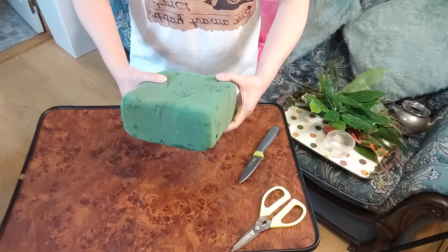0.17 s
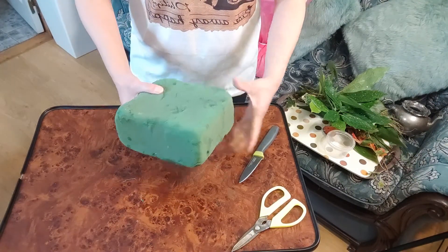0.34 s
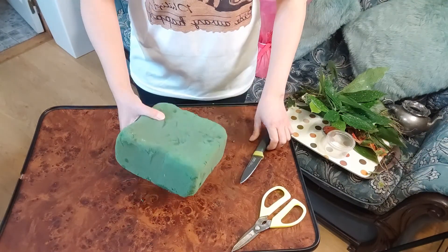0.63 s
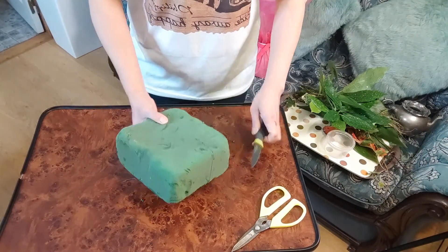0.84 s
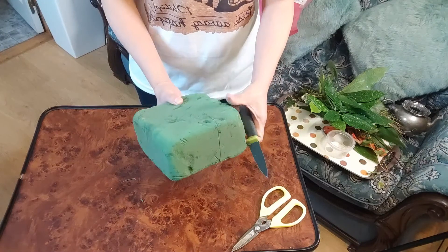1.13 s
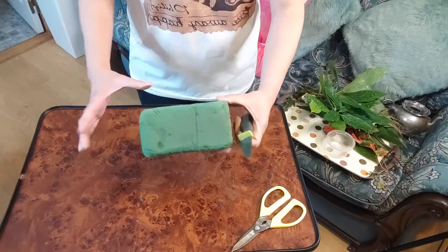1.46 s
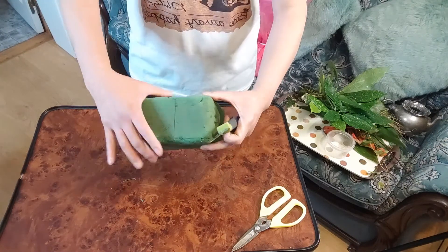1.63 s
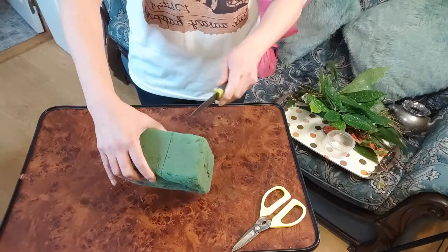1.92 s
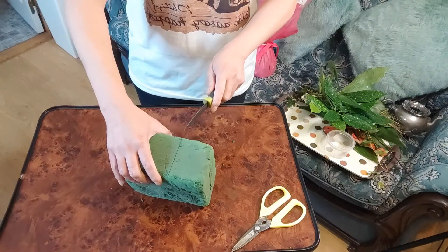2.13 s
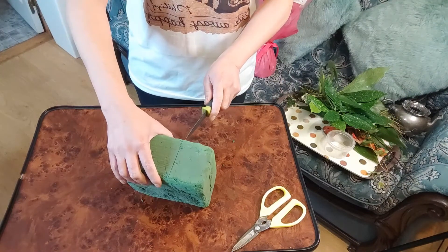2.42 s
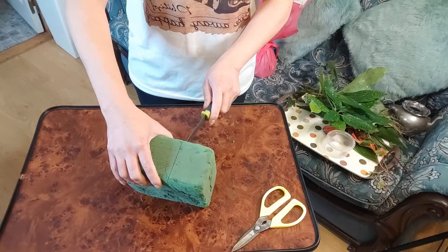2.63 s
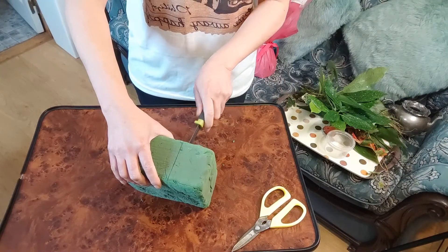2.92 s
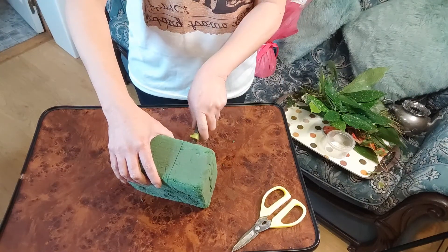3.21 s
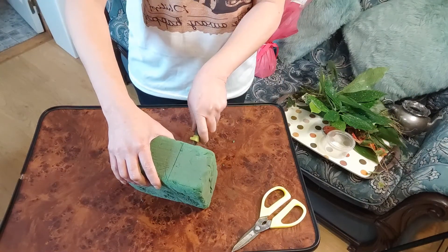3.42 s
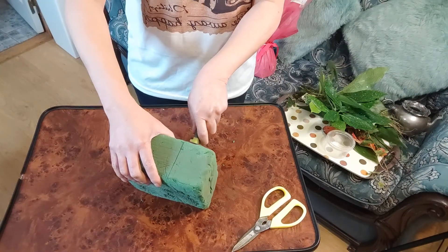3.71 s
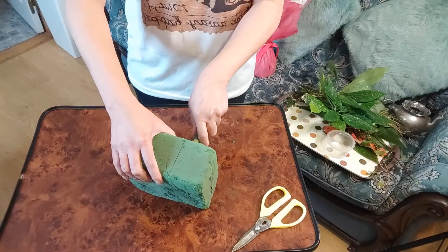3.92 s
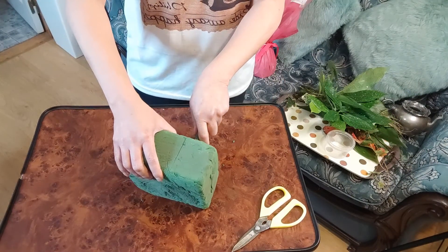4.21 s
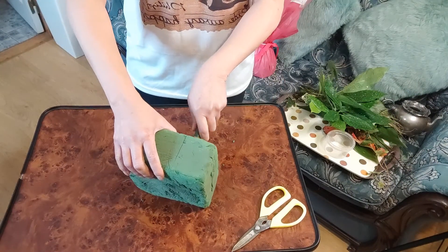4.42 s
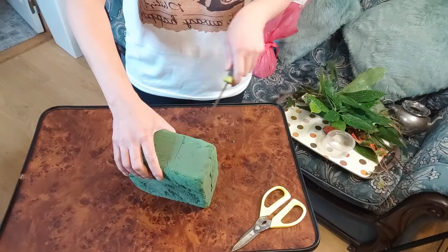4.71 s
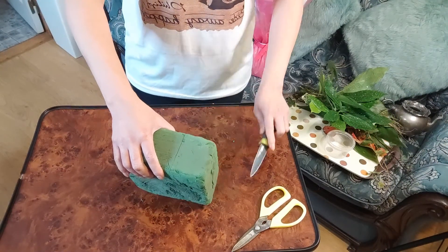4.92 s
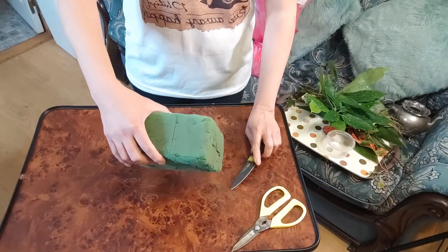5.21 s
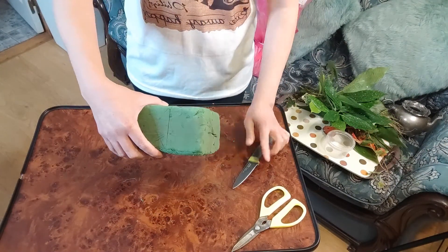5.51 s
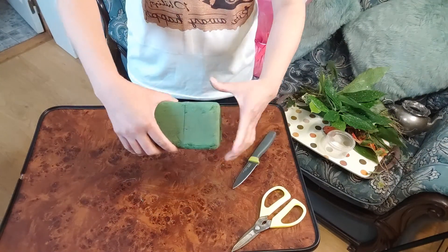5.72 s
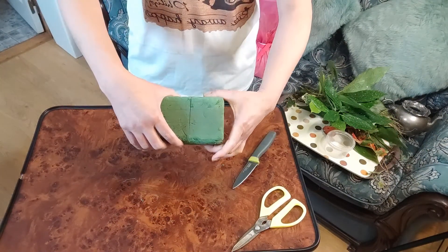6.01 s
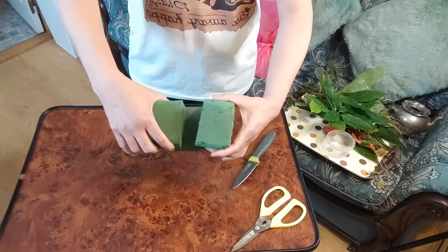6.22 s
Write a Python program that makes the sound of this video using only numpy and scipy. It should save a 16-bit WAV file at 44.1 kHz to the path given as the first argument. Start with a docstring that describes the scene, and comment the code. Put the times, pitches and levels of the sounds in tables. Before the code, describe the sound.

Dry, gritty crunching of a kitchen knife cutting floral foam, heard close up indoors over a faint room hush. Light handling scuffs and dull bumps on a small wooden table come first. The long cut and several shorter strokes end in a loud clack as the blade hits the wood. A lighter clack follows as the knife is put down, then fingers rub the foam and it cracks sharply apart.

```python
"""Soft knocks and dry scuffs, close by: fingers turn a block of floral foam over on a small wooden table.
A kitchen knife rasps in, crushing thousands of brittle cells in one long slice and a few pushes,
then breaks through onto the table with a clack and is laid down. The block snaps in two with a crackle
and a thump. The table top rings under the blows, a small living room answers over its own hush,
and a phone with widened stereo picks it all up."""
import sys
import numpy as np
from scipy import signal
from scipy.fft import rfft, irfft, next_fast_len
from scipy.io import wavfile
from scipy.ndimage import uniform_filter1d, map_coordinates

SR = 44100
rng = np.random.default_rng(int(sys.argv[2]) if len(sys.argv) > 2 else 0)


def transcribe(u):
    """Save the signal u as a 16-bit wav file named by the first command-line argument.

    u: samples, shape (n,) or (channels, n), limited to [-1, 1]; the rate is SR.
    q: integer samples, one column per channel.
    """
    v = np.clip(np.atleast_2d(u).T, -1, 1)
    q = np.round(v * 32767).astype(np.int16)
    wavfile.write(sys.argv[1], SR, q)


N = 280476

# Table levels are relative: each layer sets its own trim in the mix.
# the long first slice into the block: (time [s], rasp [dB], fizz [dB])
LONG_SLICE = [(2.66, -62, -74), (2.77, -52.5, -66.5), (2.874, -46, -50.5), (3.06, -49, -46.5),
              (3.11, -52.5, -49), (3.19, -46.5, -48.5), (3.32, -55, -62), (3.385, -74, -69)]
# short blade strokes, first nick to drawing out: (start [s], rise [s], hold [s], rasp [dB], fizz [dB])
BLADE_PUSHES = [ (2.56, 0.043, 0.005, -53, -65), (3.396, 0.0069, 0.045, -43.5, -50),
                (3.529, 0.0056, 0.26, -43, -49), (3.886, 0.0079, 0.032, -40, -45.5),
                (4.07, 0.076, 0.12, -47, -57), (4.415, 0.044, 0.1, -56, -53.5),
                (4.59, 0.03, 0.0036, -59, -59), ]
# how firmly the blade's force reaches the table: (time [s], drone [dB])
TABLE_COUPLING = [(2.6, -40), (3.24, -4.5), (3.3, 9.5), (3.43, -2.5), (3.92, -3), (4.15, -2), (4.5, 3.5)]
# sharp cracks and ticks, from foam breaking and the knife touching the table:
# (time [s], level [dB], dull jolt against crack [dB], tilt [dB/octave])
SHARP_CLICKS = [ (0.075, -45, -14, 2), (0.595, -50, 5, -9), (1.1674, -26.5, -15.5, 7.5),
                (3.399, -29, -2, 2.5), (3.532, -33, 3.5, -1.5), (3.888, -28.5, -7, 1.5),
                (3.899, -21.5, -6.5, 0), (4.069, -52, -6, -10), (4.098, -38.5, 2, 7), (4.113, -36, -6.5, 4),
                (4.1854, -12, -18, 0), (4.823, -48, -22, 0), (5.4077, -44.5, -17, -1.5),
                (6.061, -27, -17, 4), (6.067, -34.5, -18, 2.5), (6.11, -18.5, -18, 4),
                (6.1278, -25, -17, 3), (6.137, -20, -17, 3), (6.1539, -17.5, -8, -5),
                (6.1546, -8.5, -12.5, 2), ]
# the crack tearing through the block: (start [s], rise [s], hold [s], crackle [dB], thump [dB])
FINAL_TEAR = [(6.112, 0.0036, 0.032, -46.5, -58), (6.155, 0.004, 0.017, -31.5, -35)]
# hands, knife and block meeting the table:
# (time [s], clack [dB], contact low-pass [Hz], ring [dB], centre of the struck modes [Hz])
TABLE_KNOCKS = [ (0.077, -38.5, 192, -82, 300), (0.571, -49, 1050, -33, 690), (0.578, -55, 600, -36, 400),
                (0.598, -41.5, 680, -28.5, 390), (0.659, -51, 650, -30, 620), (0.672, -52, 690, -26, 630),
                (0.685, -36.5, 770, -27, 585), (0.702, -36.5, 730, -27.5, 480), (1.699, -36, 149, -52, 350),
                (3.889, -37, 1110, -27, 380), (4.071, -45, 1220, -71.5, 500), (4.098, -44, 1510, -49, 610),
                (4.113, -37, 1100, -32, 520), (4.123, -36.5, 2020, -47, 900),
                (4.1855, -13, 3420, -23.5, 328), (4.2056, -27.5, 1900, -35, 275),
                (4.451, -42, 1230, -39, 475), (5.25, -68.5, 600, -47, 354), (5.336, -72.5, 600, -46.5, 346),
                (5.389, -54, 600, -41, 353), (5.4077, -28, 3080, -15.5, 690),
                (5.4119, -40.5, 400, -32, 222), (5.415, -47, 2500, -20.5, 1650),
                (5.4225, -33, 2630, -23, 586), (5.482, -70, 600, -34.5, 350), ]
# the knife lifted, then hitting the table: (time [s], ring [dB], centre of the struck modes [Hz])
KNIFE_STRIKES = [(1.164, -38, 10500), (1.169, -47.5, 2594), (4.1859, -16.5, 900), (4.2046, -30.5, 1150)]
# fingers sliding on foam and table: (start [s], rise [s], hold [s], scuff [dB], block's body [dB])
FINGER_RUBS = [ (.069, 0.0018, 0.006, -58.5, -66), (.11, 0.061, 0.066, -68, -80),
               (.25, 0.027, .005, -64.5, -70), (.567, 0.0098, .02, -61, -82),
               (.68, 0.026, 0.0042, -67.5, -93), (.88, 0.005, 0.23, -71.5, -81),
               (1.166, 0.003, .012, -60, -65), (1.235, 0.027, 0.0095, -58.5, -65),
               (1.675, 0.062, 0.023, -56, -60), (2.12, 0.038, .005, -69, -90),
               (5.834, 0.0036, 0.0087, -58.5, -61.5), (5.88, 0.23, 0.18, -64.5, -74), ]
# foam catching on hand, table and blade: (start [s], rise [s], hold [s], level [dB], centre [Hz])
FOAM_SCRAPES = [(0.066, 0.0035, 0.0058, -61, 1340), (0.674, 0.011, .014, -62.5, 2470),
                (1.234, 0.024, .02, -68, 1700), (4.43, 0.0088, 0.068, -57.5, 1420),
                (4.601, 0.016, 0.013, -60, 1950)]
# faint finger squeaks: (start [s], length [s], pitch [Hz], level [dB])
FINGER_SQUEAKS = [(5.07, 0.047, 1390, -70), (5.672, 0.093, 3180, -71)]

# ringing modes: (frequency [Hz], bandwidth [Hz], level [dB])
TABLE_MODES = [(226.4, 11, 6), (360.3, 12.9, 15), (407, 98, 8), (504, 11, -21), (579, 12, 0.5),
               (596, 26, 6), (654.6, 29, 6.5), (747, 39, -4), (1050, 39, -22), (1245, 44, -2),
               (1450, 110, -26), (1610, 17, -11.5), (1840, 100, -1.5)]  # the wooden top
KNIFE_MODES = [(773, 17, -4.5), (890, 13, -3), (1040, 60, -3), (1063, 36, -3), (1232, 8, -10),
               (1266, 5, -5.5), (2570, 41, -10), (7300, 50, -2.5), (10100, 52, -5), (12450, 50, -9),
               (15200, 50, -4)]  # blade and handle together

# tone colours: (frequency [Hz], level [dB])
CRUSH_EQ = [(150, -20.5), (300, -7.5), (600, 0.5), (950, 2), (1350, 4.5), (2700, 0.5), (4100, -5.5),
            (6000, -8), (7800, -10), (9500, -16), (12000, -10.5), (15500, -12)]  # cells crushed by the blade
THRUST_EQ = [(120, -39.5), (240, -10.5), (340, -5), (420, -5), (650, -14.5), (1500, -10.5), (4000, -17)]  # the blade's force on the table
CLICK_EQ = [(100, -47), (330, 7.5), (450, -18), (740, 2), (1300, 1.5), (2000, -3), (3100, 0), (4650, -3),
            (7800, -8.5), (10000, -15.5), (15500, -9)]  # a single crack or tick
TEAR_EQ = [(100, -36), (330, 0), (450, -15), (740, 0.5), (1000, -0.5), (1300, 3.5), (2000, -4),
           (3100, -0.5), (4650, -9.5), (7800, -16), (10000, -12), (15500, -10)]  # the block splitting
BODY_EQ = [(70, -9), (160, -7.5), (300, -1.5), (700, 2.5), (1500, 0), (4000, -38)]  # the block's dull body
CLACK_EQ = [(100, -7.5), (200, -21), (360, -9), (550, -6), (800, -5.5), (1080, -4.5), (1650, -6),
            (3300, -11), (4600, -11), (8000, -17), (15500, -55)]  # a hard contact with the table
SKIN_EQ = [(180, -17), (300, -8), (517, -28), (821, -15), (1240, -8.5), (5850, -18), (8010, -22),
           (8840, -23), (15500, -19.5)]  # skin on foam
HUSH_EQ = [(15, -3), (25, -7.5), (38, -21.5), (50, -8.5), (62, -20), (81, -22.5), (230, -36), (460, -41.5),
           (720, -47), (1450, -52), (4000, -56), (8000, -67.5), (9200, -68), (15500, -50)]  # room tone
SIDE_EQ = [(100, 0), (400, 11), (1200, 8.5), (3000, 4), (7000, 2), (15000, 2.5)]  # the phone's boost of the side signal
LEFT_PORT_EQ = [(3000, 0.5), (4200, -0.5), (4950, 1.5), (5900, -1.5), (7000, 3.5), (7950, 7.5), (8400, 6),
                (8750, -5.5), (9800, -5), (11000, 1), (15500, 0)]  # treble of the left microphone port
RIGHT_PORT_EQ = [(3000, 0.5), (4300, -1.5), (4950, 0.5), (5900, -3), (7400, -6), (7950, -1.5), (8550, -17),
                 (9300, 2.5), (11000, -3.5), (13000, -0.5), (15500, -0.5)]  # treble of the right one

# the living room's decay: (frequency [Hz], T60 [s])
ROOM_DECAY = [(150, 0.44), (400, 0.34), (1500, 0.37), (4000, 0.38), (8000, 0.33), (15000, 0.21)]

# stroke envelopes: an ease from the peak on, plus a fade once the hold ends
PUSH_FALL = dict(ease_db_per_s=17.5, fade_db_per_s=260)
RUB_FALL = dict(ease_db_per_s=36, fade_db_per_s=226)


def cutting(crossover_hz=5000):
    """The edge crushes cells in clumps and sheds crumbs, the flanks fizz, and the table drones below."""
    clumps_db = 2.4 * wobble(260) + 0.7 * wobble(40)
    crush = cells(rate=6000, spread_db=2.5) * amp(clumps_db)
    grind = cells(rate=8700, spread_db=2.5) * amp(0.19 * clumps_db)
    force = curve(LONG_SLICE, column=1) + strokes(BLADE_PUSHES, **PUSH_FALL, column=3)
    speed = curve(LONG_SLICE, column=2) + strokes(BLADE_PUSHES, **PUSH_FALL, column=4)
    edge_share = lambda f: 1 / (1 + (f / crossover_hz) ** 4)
    rasp = force * unit(filtered(coloured(crush, CRUSH_EQ), lambda f: np.sqrt(edge_share(f))))
    fizz = speed * unit(filtered(coloured(grind, CRUSH_EQ), lambda f: np.sqrt(1 - edge_share(f))))
    drone = force * curve(TABLE_COUPLING) * unit(pressed_table(coloured(crush, THRUST_EQ)))
    crumbs = force * unit(coloured(cells(rate=170, spread_db=3.5), CRUSH_EQ))
    return amp(-5) * rasp + amp(0.97) * fizz + amp(-2.5) * drone + amp(-6) * crumbs


def pressed_table(x, damping=4):
    """The table's modes resonate, broadened by the hand that presses the block down."""
    def mode(f, hz, width):
        loss = 1j * f * width * damping
        return loss / (hz ** 2 - f ** 2 + loss)
    return filtered(x, lambda f: sum(amp(db) * mode(f, hz, width) for hz, width, db in TABLE_MODES))


def sharp_clicks(rise_s=0.0004, t60_s=0.0055):
    """Foam breaking and the knife touching the table give sharp cracks and ticks over a dull jolt."""
    track, t = np.zeros(N), np.arange(SR // 10) / SR
    envelope = amp(-60 * t / t60_s) * (1 - np.exp(-t / rise_s))
    for s, db, jolt_db, tilt in SHARP_CLICKS:
        burst = rng.standard_normal(len(t)) * envelope
        tilted_eq = [(hz, level + tilt * np.log2(hz / 2000)) for hz, level in CLICK_EQ]
        crack = unit_energy(coloured(burst, tilted_eq))
        jolt = unit_energy(coloured(burst, BODY_EQ))
        add(track, s, amp(db + 13) * (crack + amp(jolt_db) * jolt))
    return track


def tearing(thump_hz=313, thump_q=2.3):
    """The last crack runs through the uncut foam, and the halves spring apart with a dull thump."""
    crackle = unit(coloured(cells(rate=6000, spread_db=9), TEAR_EQ))
    resonance = lambda f: 1 / (1 + 1j * thump_q * (f / thump_hz - thump_hz / (f + 1)))
    thump = unit(filtered(cells(rate=4300, spread_db=1), resonance))
    crackle *= strokes(FINAL_TEAR, ease_db_per_s=42, fade_db_per_s=798.5, column=3)
    thump *= strokes(FINAL_TEAR, ease_db_per_s=560, fade_db_per_s=798.5, column=4)
    return crackle + thump


def knocks(t60_s=0.033):
    """Each blow gives a short clack, dull if the contact is soft, and rings the table's modes."""
    clacks, rings, t = np.zeros(N), np.zeros(N), np.arange(SR // 8) / SR
    for s, clack_db, corner_hz, ring_db, centre_hz in TABLE_KNOCKS:
        force = (t == 0) + 0.099 * rng.standard_normal(len(t)) * amp(-60 * t / t60_s)
        # bending waves smear the blow: the treble runs ahead of the bass
        hard = filtered(coloured(force, CLACK_EQ), lambda f: np.exp(-0.2j * np.sqrt(f)))
        soft = signal.sosfilt(signal.butter(3, corner_hz, fs=SR, output="sos"), hard)
        add(clacks, s, amp(clack_db + 17.5) * unit_energy(soft + amp(-31) * hard))
        add(rings, s, amp(ring_db) * ringing(TABLE_MODES, centre_hz, rise_s=0.0059))
    return clacks, rings


def knife():
    """The knife ticks brightly when lifted and rings lower when it strikes the table."""
    track = np.zeros(N)
    for s, db, centre_hz in KNIFE_STRIKES:
        add(track, s, amp(db) * ringing(KNIFE_MODES, centre_hz, rise_s=0.0006))
    return track


def fingers():
    """Skin scuffs the surface cells as the block is turned; a firm grip brings out its body."""
    scuff = cells(rate=3400, spread_db=3.5) * amp(4.3 * wobble(120))
    slide = strokes(FINGER_RUBS, **RUB_FALL, column=3) * unit(coloured(scuff, SKIN_EQ))
    body = strokes(FINGER_RUBS, **RUB_FALL, column=4) * unit(coloured(scuff, BODY_EQ))
    return amp(2.5) * slide + body


def scrapes():
    """A small patch of foam catches and rasps in one broad resonance."""
    grit, track = cells(rate=2500, spread_db=1.5), np.zeros(N)
    for scrape in FOAM_SCRAPES:
        peak = signal.iirpeak(scrape[4], Q=1.25, fs=SR)
        band = signal.lfilter(*peak, signal.lfilter(*peak, grit))
        track += strokes([scrape], **RUB_FALL, column=3) * unit(band)
    return track


def squeaks():
    """Skin sticks and slips on a smooth surface in a brief, wavering tone."""
    t, track = np.arange(N) / SR, np.zeros(N)
    for s, length, hz, db in FINGER_SQUEAKS:
        phase = 2 * np.pi * np.cumsum(hz * (1 + 0.0068 * wobble(90))) / SR
        envelope = np.sin(np.pi * np.clip((t - s) / length, 0, 1))
        track += amp(db) * envelope * np.sin(phase)
    return track


def in_room(x, lead_s, wet_db, build_s, scatter_db):
    """Direct sound reaches the left port first; the walls answer, hands and table scatter the treble."""
    left_first = lambda f: np.exp(1j * np.pi * f * lead_s * np.array([[1], [-1]]))
    direct = filtered(x, lambda f: left_first(f) / (1 + 1j * f / 9000))  # softened top end
    treble = filtered(x, lambda f: (1j * f / (2000 + 1j * f)) ** 2)
    far = drifting(x, lambda: walls(build_s), move_s=0.35)  # redrawn so no single colouring lingers
    near = drifting(treble, scatter, move_s=0.07)  # shifts as the hands move
    return direct + amp(wet_db) * far + amp(scatter_db) * near


def scatter(t60_s=0.011):
    """Early reflections off hands and table: a few milliseconds, different at each port."""
    t = np.arange(SR // 80) / SR
    return unit_energy(rng.standard_normal((2, len(t))) * amp(-60 * t / t60_s))


def walls(build_s):
    """One reverb tail from the walls, alike at both ports only in the bass."""
    hz, t, spectra = signal.stft(rng.standard_normal((2, SR // 3)), SR, nperseg=256)
    spectra *= amp(-60 * t / along(ROOM_DECAY, hz)[:, None])
    coherence = 1 / (1 + (hz[:, None] / 700) ** 2)
    spread = np.arccos(coherence) / 2
    mid, side = spectra[0] * np.cos(spread), spectra[1] * np.sin(spread)
    tail = signal.istft(np.array([mid + side, mid - side]), SR, nperseg=256)[1]
    age = np.arange(tail.shape[1]) / SR
    tail *= 1 - np.exp(-(age / build_s) ** 2)
    return tail / np.linalg.norm(tail[0])


def room_tone(level_db=-42):
    """Low rumble and thin hiss of the quiet room, leaning left."""
    air = np.array([unit(coloured(noise, HUSH_EQ, size=16384)) for noise in rng.standard_normal((2, N))])
    return amp([[level_db + 1.5], [level_db - 2.5]]) * air


def cells(rate, spread_db):
    """Foam cells bursting at random, rate a second, each of its own size."""
    bursts = rng.random(N) < rate / SR
    return bursts * rng.choice([-1, 1], N) * amp(spread_db * rng.standard_normal(N))


def ringing(modes, centre_hz, rise_s):
    """Struck modes dying away; those around the centre take most of the blow."""
    t, ring = np.arange(SR // 3) / SR, 0
    for hz, width, db in modes:
        gain = amp(db - 20 * np.log2(hz / centre_hz) ** 2)
        ring += gain * np.sin(2 * np.pi * hz * t) * np.exp(-np.pi * width * t)
    return ring / np.abs(ring).max() * (1 - np.exp(-t / rise_s))


def strokes(rows, ease_db_per_s, fade_db_per_s, column, swell_db=17):
    """Envelope of hand strokes: each swells, eases off while it holds, then lets go."""
    t, gain = np.arange(N) / SR, np.zeros(N)
    for row in rows:
        start, rise, hold = row[:3]
        past_peak = t - start - rise
        swell = swell_db * np.clip(past_peak / rise, -1, 0)
        fall = ease_db_per_s * np.maximum(past_peak, 0) + fade_db_per_s * np.maximum(past_peak - hold, 0)
        gain += (t >= start) * amp(row[column] + swell - fall)
    return uniform_filter1d(gain, size=128)


def curve(rows, column=1):
    """A fader ride along one dB column; silence outside it."""
    columns = np.transpose(rows)
    return amp(np.interp(np.arange(N) / SR, columns[0], columns[column], left=-np.inf, right=-np.inf))


def drifting(x, reflections, move_s):
    """Crossfade the sound into a fresh set of reflections every move_s."""
    hop = round(move_s * SR)
    fade = np.sin(np.pi * np.arange(2 * hop) / (2 * hop))
    padded, out = np.pad(x, (hop, 2 * hop)), np.zeros((2, N + 2 * SR))
    for start in range(0, N + hop, hop):
        piece = padded[start:start + 2 * hop] * fade
        if np.abs(piece).max() > 1e-6:
            echo = signal.fftconvolve(piece[None], reflections(), axes=1)
            out[:, start:start + echo.shape[1]] += echo
    return out[:, hop:hop + N]


def wobble(rate):
    """A smooth random curve, rate knots a second."""
    return map_coordinates(rng.standard_normal(int(N * rate / SR) + 4), [np.arange(N) * rate / SR])


def coloured(x, eq, size=2048):
    """x through a minimum-phase EQ."""
    cepstrum = irfft(np.log(amp(along(eq, np.fft.rfftfreq(size, 1 / SR)))))
    cepstrum[1:size // 2] *= 2
    cepstrum[size // 2 + 1:] = 0
    return signal.fftconvolve(x, irfft(np.exp(rfft(cepstrum))))[:len(x)]


def filtered(x, response):
    """x through a complex frequency response."""
    size = x.shape[-1]
    padded = next_fast_len(size + 8192)
    return irfft(rfft(x, padded) * response(np.fft.rfftfreq(padded, 1 / SR)), padded)[..., :size]


def along(points, hz):
    """Read (frequency [Hz], value) points on a log axis."""
    freqs, values = np.transpose(points)
    return np.interp(np.log(hz + 1), np.log(freqs + 1), values)


def add(track, s, sound):
    """Mix a sound into the track at s seconds."""
    start = round(s * SR)
    track[start:start + len(sound)] += sound[:N - start]


def amp(db):
    """Decibels to gain."""
    return 10 ** (np.asarray(db) / 20)


def unit(x):
    """Scale to rms 1."""
    return x / np.sqrt(np.mean(x ** 2) + 1e-20)


def unit_energy(x):
    """Scale each channel to energy 1."""
    return x / np.linalg.norm(x, axis=-1, keepdims=True)


def scene():
    """Four buses of handiwork over room tone; friction gets the most reverb, the rings the least."""
    clacks, table_rings = knocks()
    rings = table_rings + knife()
    friction = cutting() + fingers() + scrapes() + tearing() + squeaks()
    clicks = sharp_clicks()
    return (in_room(friction, lead_s=0.00009, wet_db=0, build_s=0.0015, scatter_db=3.5)
            + in_room(clacks, lead_s=0.0001, wet_db=-3, build_s=0.0013, scatter_db=-1)
            + in_room(clicks, lead_s=0.00011, wet_db=-5.5, build_s=0.007, scatter_db=-5)
            + in_room(rings, lead_s=0.00012, wet_db=-9.5, build_s=0.0072, scatter_db=2)
            + room_tone())


def record(dry):
    """The phone widens the stereo, colours each port's treble, rounds off peaks and cuts the very top."""
    ceiling, top_hz = 0.6, 15700
    mid = (dry[0] + dry[1]) / 2
    side = filtered((dry[0] - dry[1]) / 2, lambda f: amp(along(SIDE_EQ, f)))
    wide = np.array([mid + side, mid - side])
    ported = filtered(wide, lambda f: amp([along(LEFT_PORT_EQ, f), along(RIGHT_PORT_EQ, f)]))
    rounded = ported / (1 + (ported / ceiling) ** 4) ** (1 / 4)
    return filtered(rounded, lambda f: f < top_hz)


dry = scene()
out = record(dry)
transcribe(out)
```